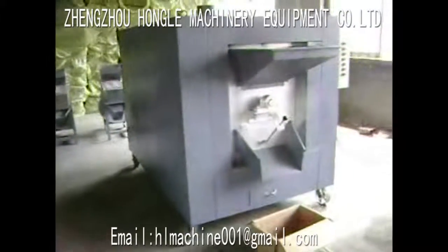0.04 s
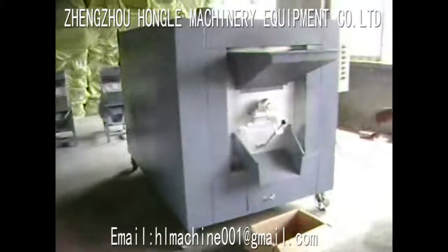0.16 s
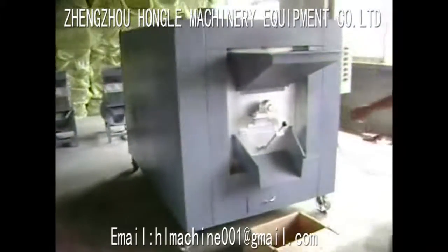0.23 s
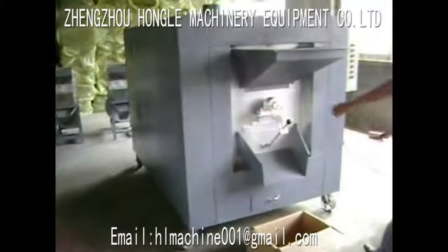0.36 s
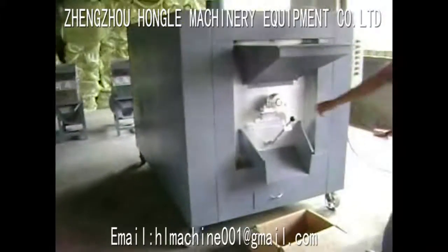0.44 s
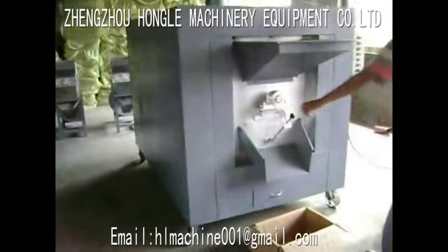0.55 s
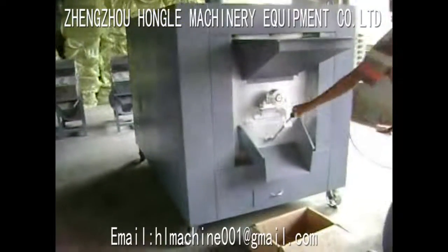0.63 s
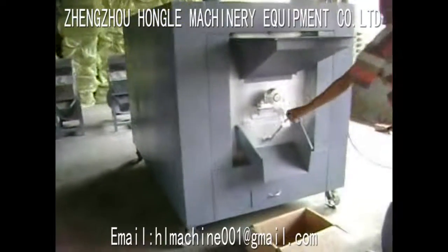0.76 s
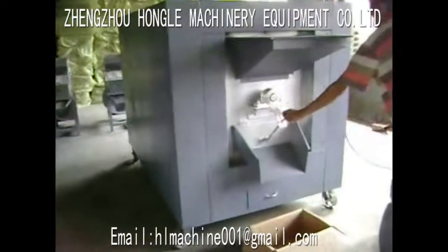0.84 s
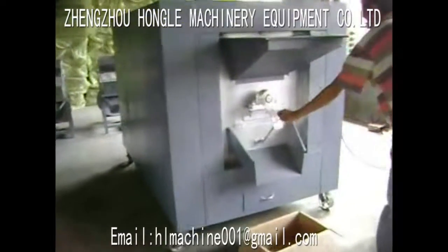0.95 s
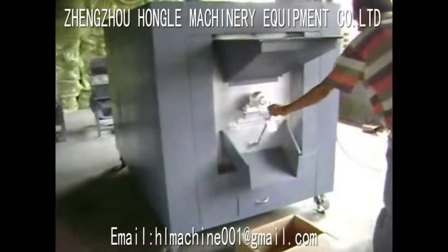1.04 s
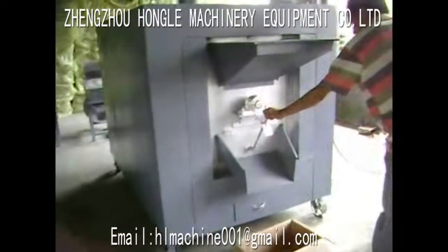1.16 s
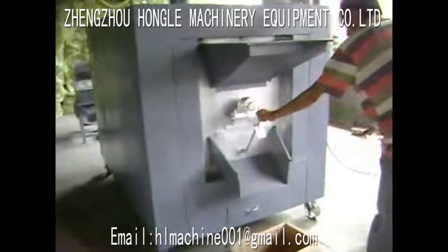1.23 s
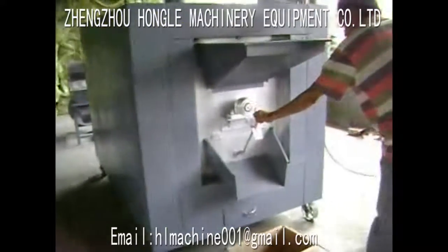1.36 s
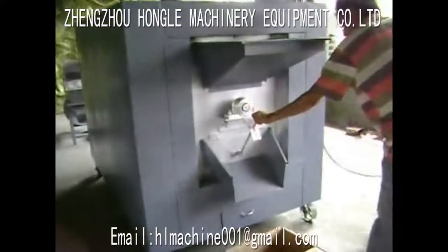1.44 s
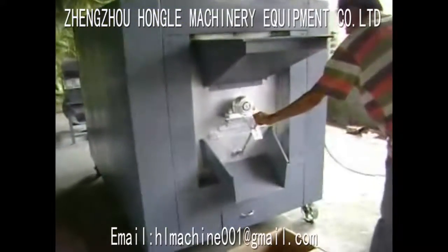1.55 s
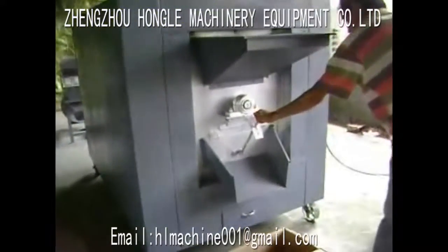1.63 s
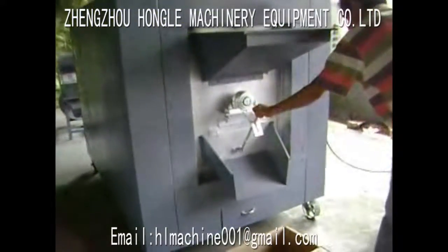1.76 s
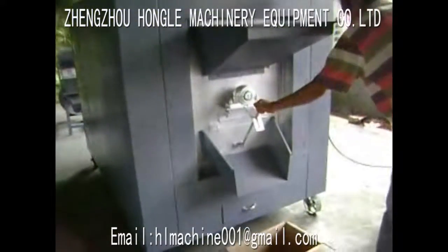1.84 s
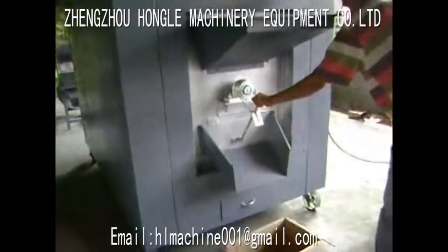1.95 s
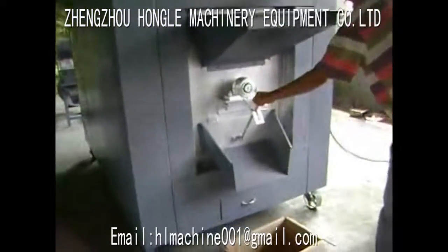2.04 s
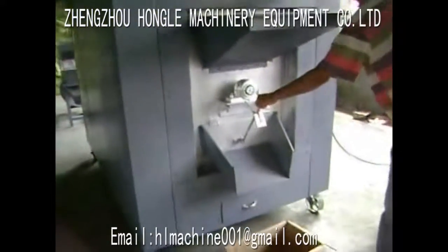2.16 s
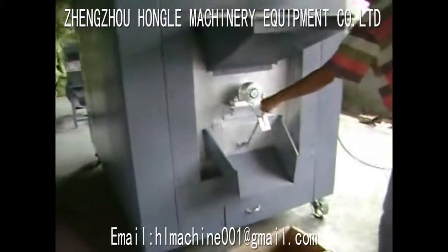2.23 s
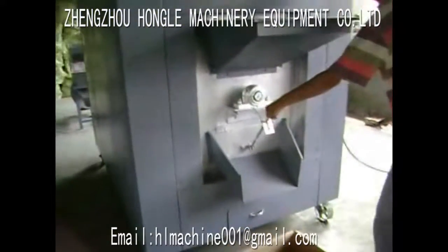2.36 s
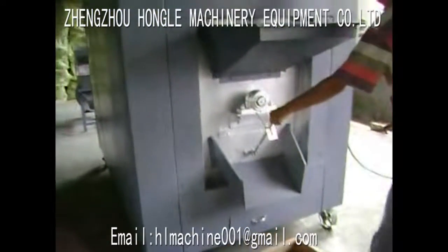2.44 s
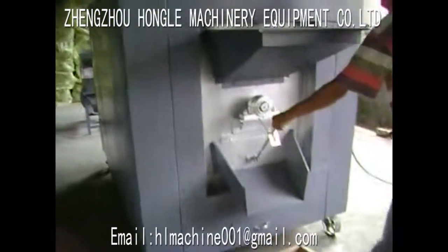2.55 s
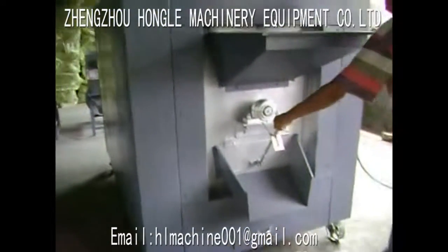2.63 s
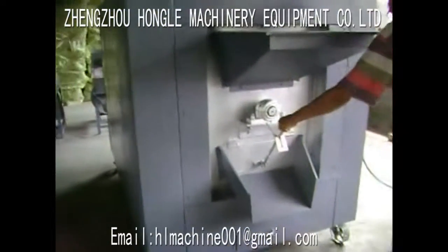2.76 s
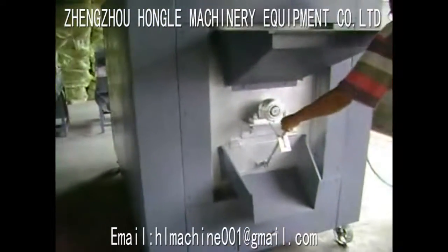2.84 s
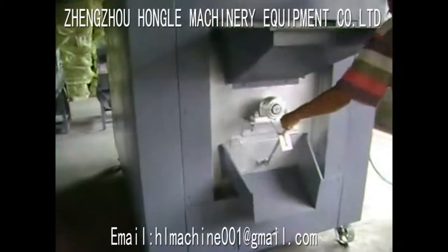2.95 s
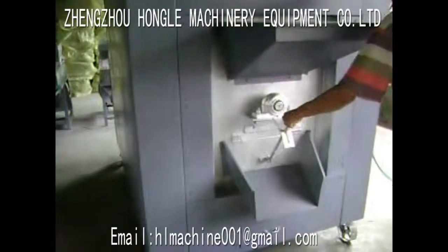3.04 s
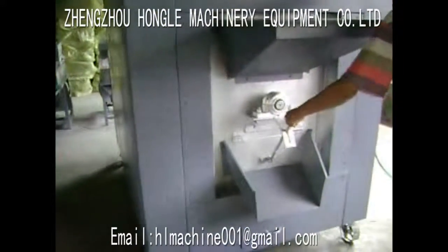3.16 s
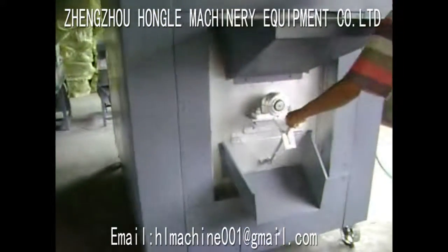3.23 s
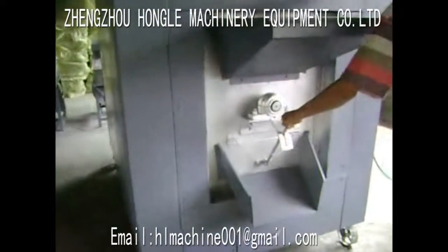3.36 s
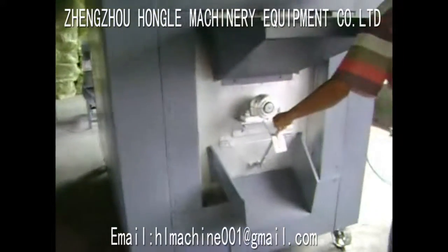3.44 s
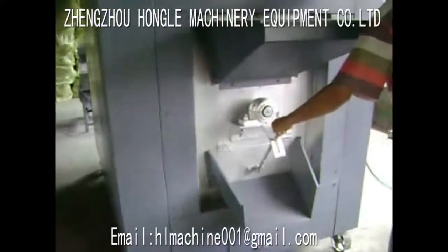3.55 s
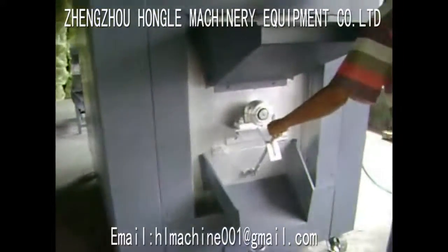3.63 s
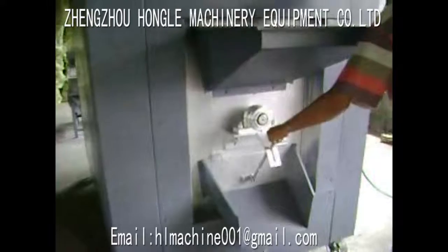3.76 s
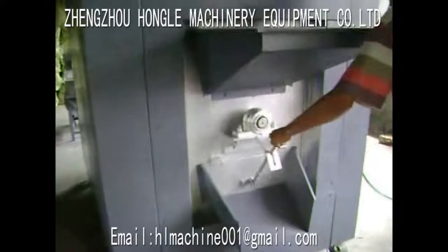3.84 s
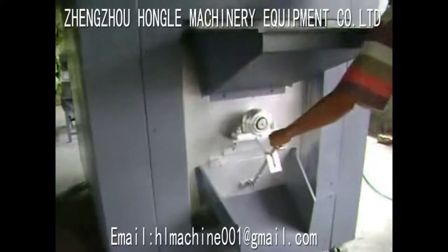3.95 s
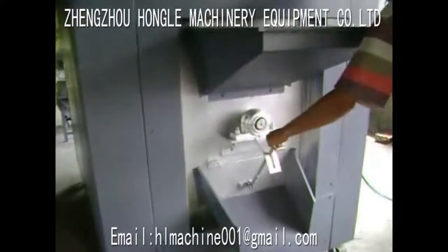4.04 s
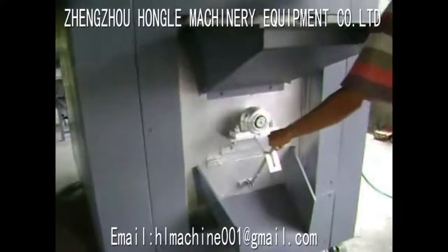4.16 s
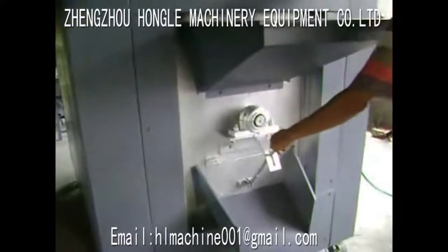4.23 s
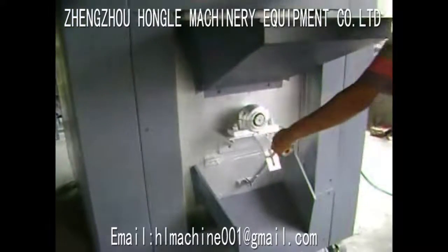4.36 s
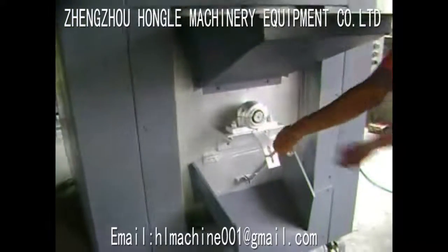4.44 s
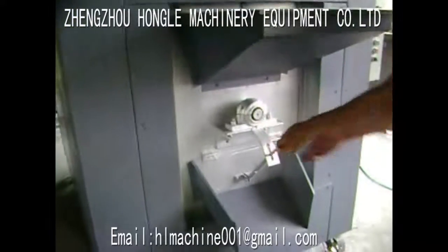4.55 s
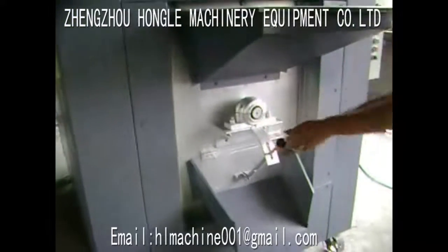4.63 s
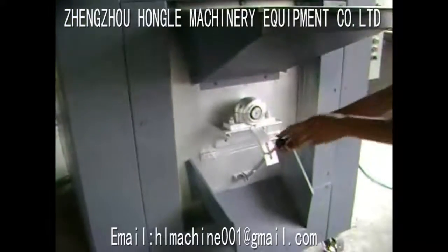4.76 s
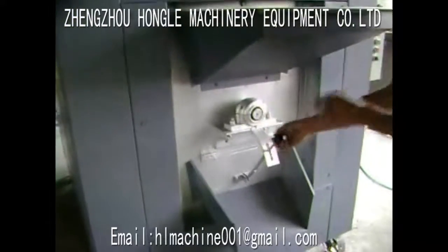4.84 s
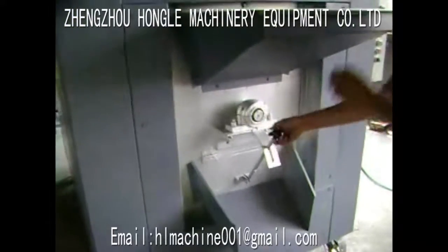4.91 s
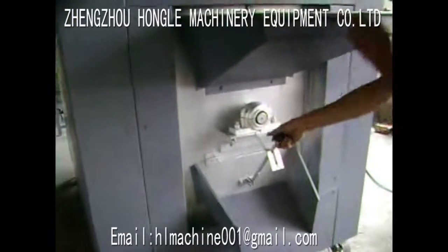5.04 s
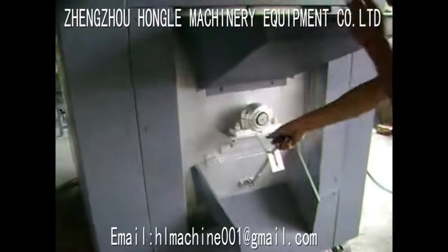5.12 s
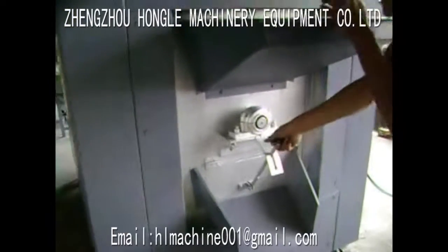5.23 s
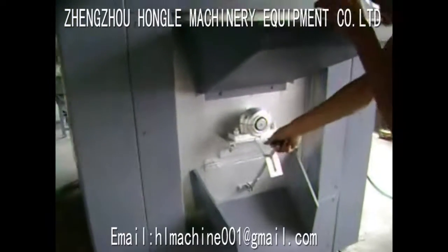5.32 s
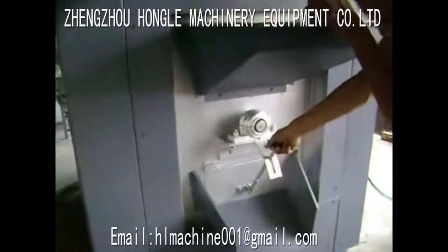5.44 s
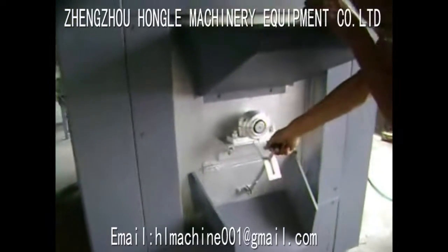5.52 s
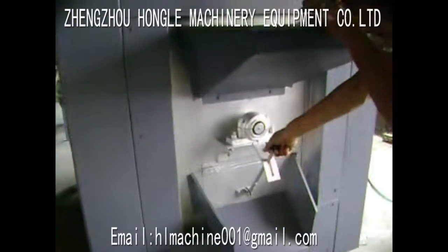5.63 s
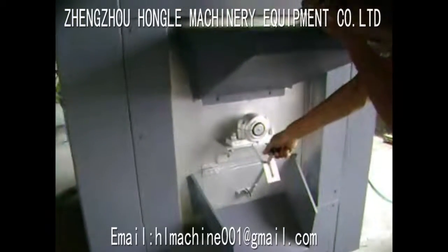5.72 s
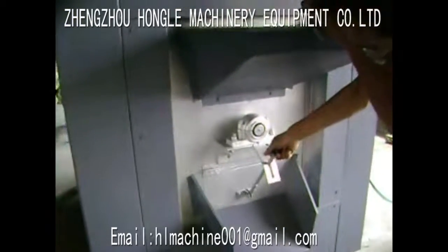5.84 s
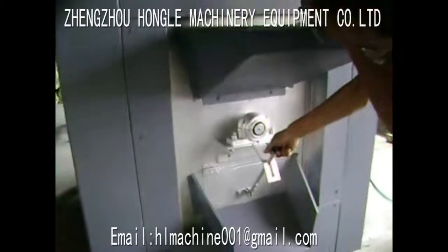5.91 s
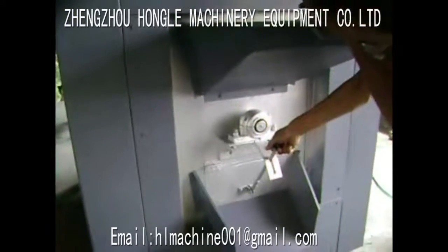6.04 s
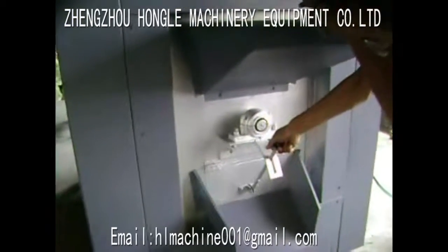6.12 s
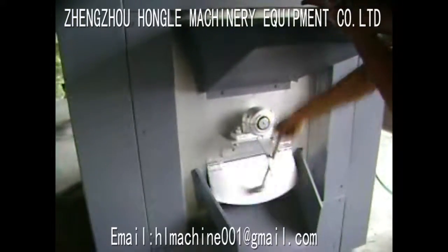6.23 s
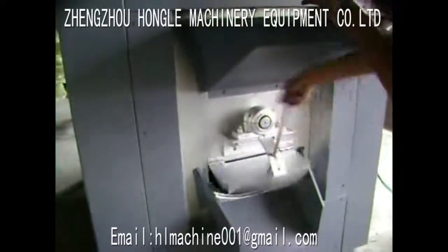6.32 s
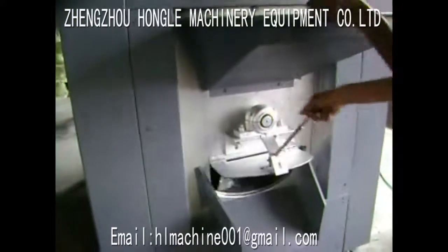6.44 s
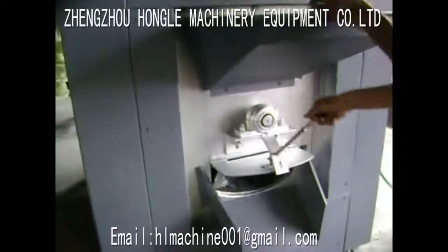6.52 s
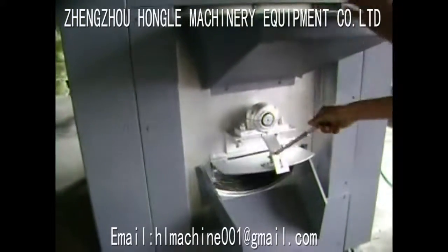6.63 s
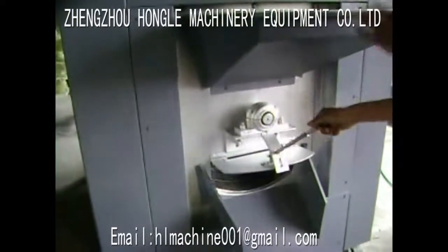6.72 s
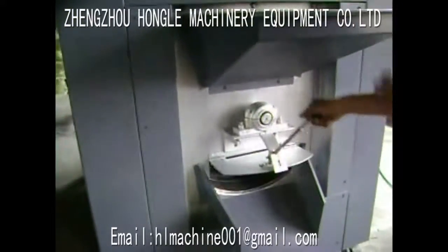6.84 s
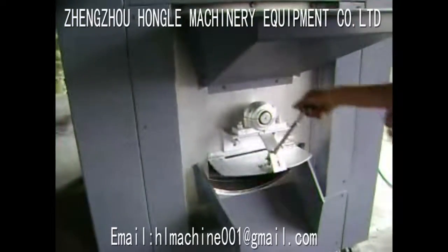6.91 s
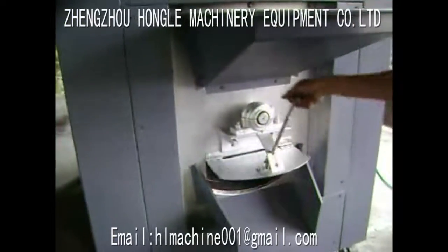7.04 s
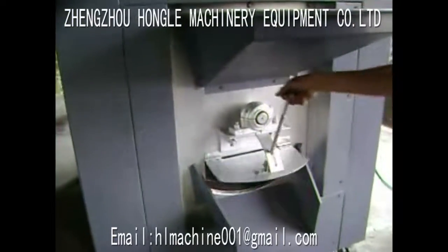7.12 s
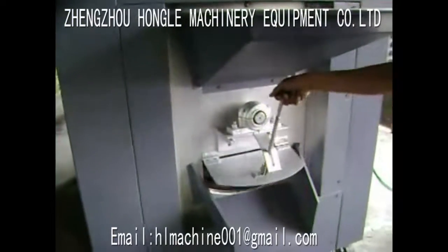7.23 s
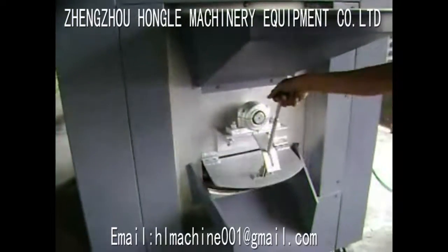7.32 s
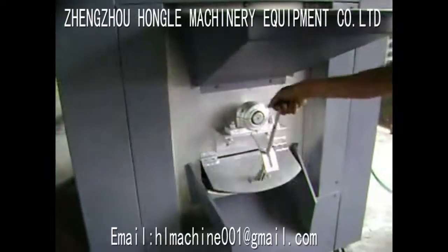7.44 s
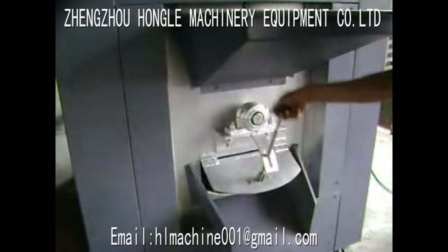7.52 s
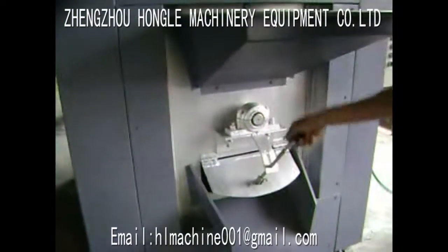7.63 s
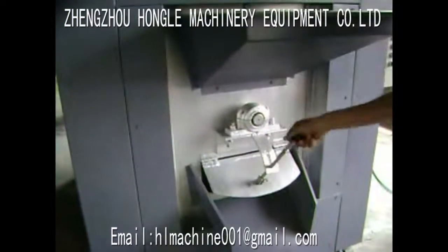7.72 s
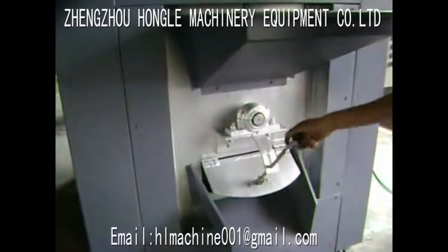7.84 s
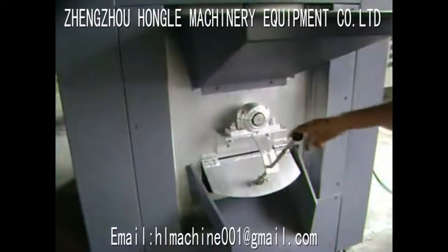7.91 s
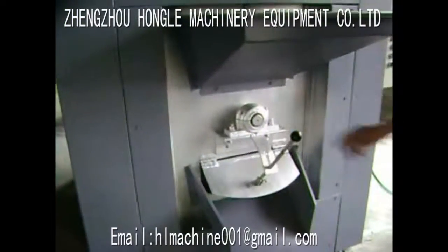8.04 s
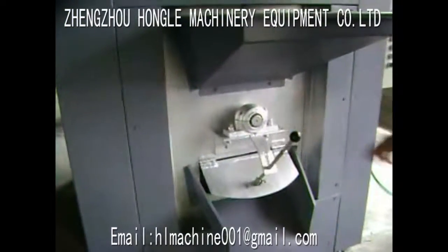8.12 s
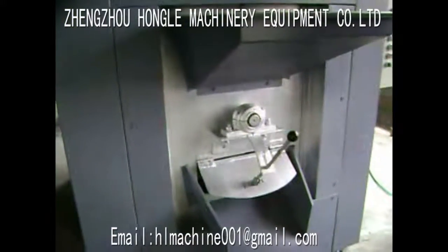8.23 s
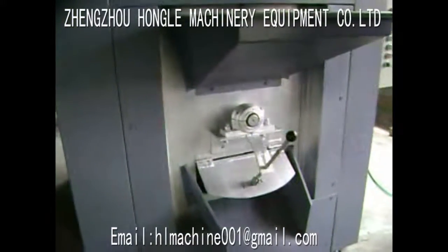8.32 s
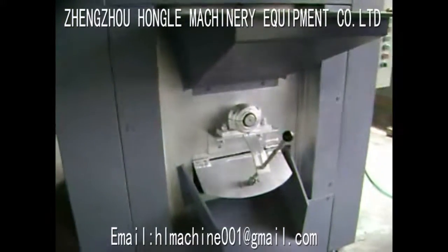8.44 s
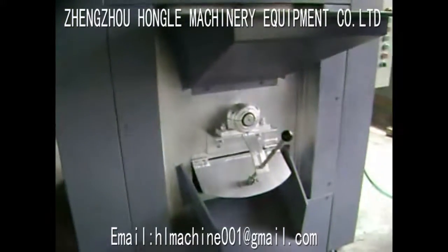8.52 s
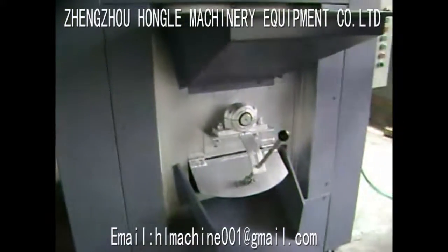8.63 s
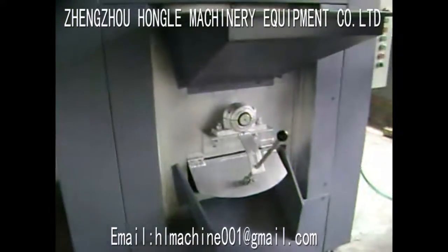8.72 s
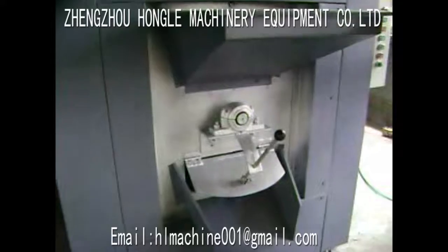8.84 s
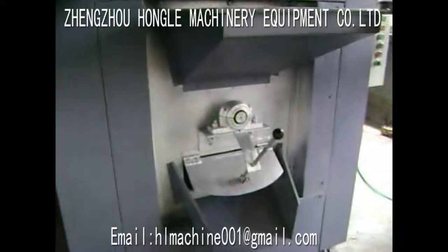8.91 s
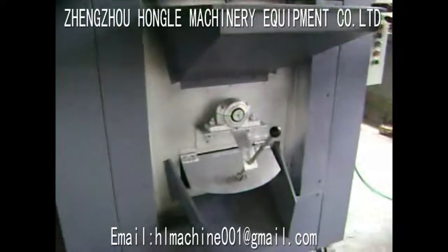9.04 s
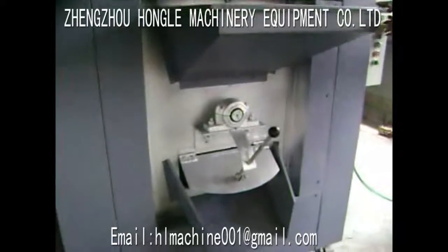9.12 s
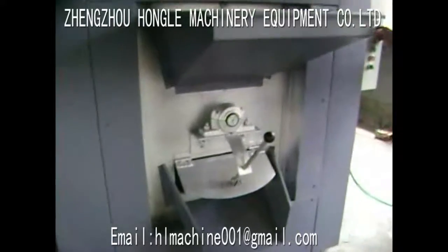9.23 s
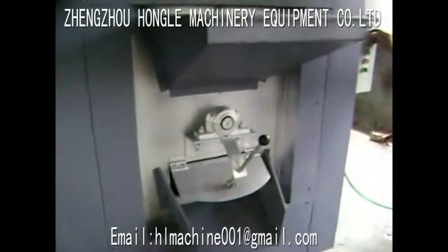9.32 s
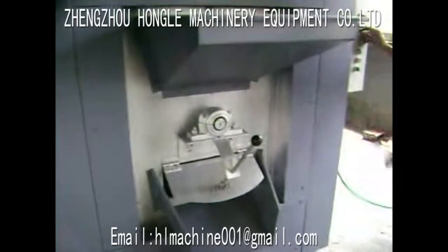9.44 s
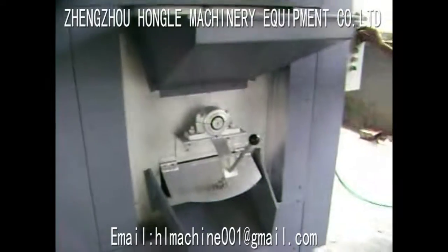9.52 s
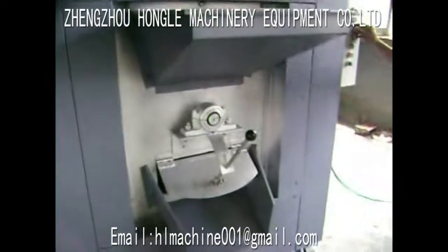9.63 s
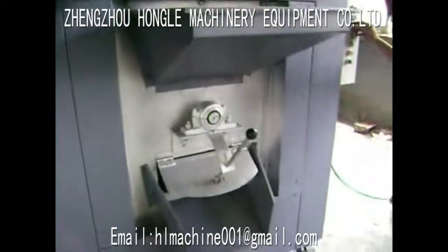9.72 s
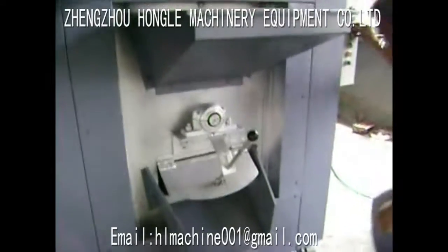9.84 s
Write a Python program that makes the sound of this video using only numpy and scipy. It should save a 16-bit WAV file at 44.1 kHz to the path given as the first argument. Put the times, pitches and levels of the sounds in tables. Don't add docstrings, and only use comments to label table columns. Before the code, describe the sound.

A drum roaster roars and whines steadily in a workshop while a steel lever knocks, its outlet door bangs open, groans and clacks shut.

```python
import sys
import numpy as np
from scipy import signal
from scipy.fft import rfft, irfft
from scipy.io import wavfile
from scipy.ndimage import uniform_filter1d

SR = 44100
rng = np.random.default_rng(int(sys.argv[2]) if len(sys.argv) > 2 else 0)


def store_pcm(level_fs):
    pcm = np.round(np.clip(level_fs, -1, 1) * 32767).astype(np.int16)
    wavfile.write(sys.argv[1], SR, np.atleast_2d(pcm).T)


def ratio_of_db(decibels):
    return 10 ** (np.asarray(decibels, float) / 20)


N = 435266

TOOTH_HZ = 133.82
LAND_S = 6.33

# frequency in Hz, density in dB per Hz.
CRACK = [(59, -46.5), (100, -14), (495, -5), (957, -5), (1220, -7), (1530, -15), (2200, -5.5),
         (3290, -15.5), (4650, -15.5), (6360, -32), (8270, -58), (14000, -120)]
# time in seconds, slip rate in Hz, level in dB.
GROAN = [
    (7.13, 133.3, -35.5),
    (7.23, 128.5, -28.5),
    (7.344, 129.3, -24.5),
    (7.414, 133.5, -45),
    (7.494, 127.8, -27),
    (7.53, 131, -46.5),
]


def evened(x):
    return x / np.sqrt(np.mean(x ** 2) + 1e-20)


def read(points, hz):
    f, value = np.transpose(points)
    return np.interp(np.log(hz + 1), np.log(f + 1), value)


def follow(rows, t):
    s, *columns = np.transpose(rows)
    return [np.interp(t, s, c) for c in columns]


def colour(x, points):
    gain = ratio_of_db(read(points, np.fft.rfftfreq(len(x), 1 / SR)))
    return evened(irfft(rfft(x) * gain, len(x)))


def resonate(x, hz, width):
    r = np.exp(-np.pi * width / SR)
    return 2 * signal.lfilter([1 - r], [1, -r * np.exp(2j * np.pi * hz / SR)], x).real


def resonate_twice(x, hz, width):
    return resonate(resonate(x, hz, width), hz, width)


def bump(t, middle, length):
    return np.cos(np.pi * np.clip((t - middle) / length, -.5, .5)) ** 2


def drift(t, top_hz):
    coarse = t[::512]
    waves = [np.sin(2 * np.pi * (f * coarse + rng.random())) / np.sqrt(f) for f in np.geomspace(.2, top_hz, num=20)]
    return np.interp(t, coarse, evened(sum(waves)))


def swell(t, rest_db, rows):
    coarse = t[::64]
    rises = sum(ratio_of_db(db) * bump(coarse, s, n) for s, n, db in rows)
    return ratio_of_db(rest_db) + np.interp(t, coarse, rises)


def tone(turns, db):
    return np.sqrt(2) * ratio_of_db(db) * np.sin(2 * np.pi * (turns + rng.random()))


def add(mix, s, sound):
    part = mix[round(s * SR):][:len(sound)]
    part += sound[:len(part)]


def mains_hum():
    t = np.arange(N) / SR
    start_s, period_s, rest, skew = .2, 2.35, 0.26, 0.4
    surge = np.sin(np.pi * ((t - start_s) / period_s % 1) ** skew) ** 2
    level = ratio_of_db(-44) * (rest + surge) + ratio_of_db(-44) * bump(t, 5.55, 1.0)
    return tone(50.2 * t, 1.2 * drift(t, 20)) * level


def panel():
    # middle in seconds, length in seconds, top level in dB.
    sings = [(.05, .4, -31), (1.3, 1.3, -33.5), (2.1, .7, -32.5), (2.58, .4, -34), (3.41, 0.36, -33),
             (4.12, .7, -38.5), (5.95, 1.1, -34), (6.5, .7, -34), (7.72, .5, -35.5), (8.77, 0.72, -34),
             (9.75, .6, -28.5)]
    t = np.arange(N) / SR
    turns = np.cumsum(526 * (1 + .006 * drift(t, 25))) / SR
    return tone(turns, -4 + 1.7 * drift(t, 21)) * swell(t, -43.5, sings)


def gears():
    # order of the tooth rate, level in dB.
    weak_orders = [(15, -46.5), (18, -46.5), (4, -47), (9, -46)]
    # order of the tooth rate, resting level in dB.
    strong_orders = [(16, -42), (17, -42.5), (5, -45), (6, -46)]
    # middle in seconds, length in seconds, order, top level in dB.
    swells = [(.25, 0.62, 16, -31.5), (.72, .6, 16, -35), (1.17, .35, 16, -34), (1.63, 0.63, 16, -30.5),
              (2.17, 1, 16, -33), (2.7, 0.53, 16, -41), (3.15, .5, 16, -42), (3.88, 0.54, 16, -34.5),
              (4.9, 1.2, 16, -38.5), (7.15, 1.4, 16, -38.5), (8.6, .4, 16, -42), (8.98, .6, 16, -37),
              (.75, .7, 17, -41), (2.15, 0.65, 17, -38.5), (3.05, .9, 17, -41.5), (5.0, 1.36, 17, -38.5),
              (7.15, .9, 17, -30.5), (7.75, 1.2, 17, -34), (8.78, 0.42, 17, -39), (9.82, .6, 17, -34.5),
              (2.1, 1.4, 5, -36), (3.6, 1.06, 5, -32), (4.42, 0.98, 5, -33), (5.6, 1.1, 5, -36.5),
              (6.7, .9, 5, -36.5), (.5, 1.0, 6, -37.5), (1.3, .7, 6, -37), (3.05, 0.65, 6, -36.5),
              (7.5, 1.1, 6, -37.5), (8.33, .5, 6, -43)]
    t = np.arange(N) / SR
    teeth = np.cumsum(TOOTH_HZ * (1 + 0.00036 * drift(t, 4))) / SR
    out = np.zeros(N)
    for order, rest_db in strong_orders:
        rows = [(s, n, db) for s, n, k, db in swells if k == order]
        out += tone(order * teeth, 1.1) * swell(t, rest_db, rows)
    for order, db in weak_orders:
        out += tone(order * teeth, db + 4.0 * drift(t, 2.1))
    return out


def tumble():
    # frequency in Hz, density in dB per Hz.
    roar = [(25, -23), (80, -16.5), (103, -10), (272, -7), (443, -12.5), (521, -0.5), (584, -4.5), (656, 2),
            (867, -1), (1230, 0), (1510, -9), (2190, -12.5), (2580, -12), (5040, -15), (6360, -29.5),
            (8270, -69), (14000, -120)]
    # frequency in Hz, width in Hz, dB over the roar.
    casing = [(30, 33, 7), (96, 13, 10), (185.6, 26, 2), (290, 55, -3), (369, 39, 8), (524, 23, 1.5),
              (752, 25, -6), (1222, 29, 0.5), (2226, 520, .6)]
    # middle in seconds, length
    # in seconds, rise in dB, share of that rise in the casing band.
    surges = [(.65, 1.1, 1.5, 0.5), (1.197, .4, 3.5, .7), (1.671, 0.43, 3, .8), (2.75, 0.9, 2, 0.5),
              (3.3, 0.33, 1.5, 1.), (3.87, 0.37, 3.5, 0.2), (4.3, 0.59, -2, .3), (5.007, 1, 3, .4),
              (6.421, 0.29, 15.5, 1.), (6.661, 0.51, 3.5, .95), (7.25, 0.93, 8, 0.44), (7.8, 1.34, 7, 0.2),
              (8.57, 0.49, 9, 0.26), (8.95, 1.06, 2.5, .6), (9.793, 1, 9.5, .3)]
    # middle in seconds, length in seconds, rise in dB.
    booms = [
        (.05, .6, -5.5),
        (1.1, 0.55, 3),
        (2.3, .6, -2),
        (3.35, .5, 3.5),
        (4.0, .3, 3),
        (5.9, .8, 2.5),
        (6.6, .45, 9.5),
        (7.719, 0.65, 6.5),
        (9.3, .6, -1.5),
    ]
    strikes = rng.random(N) < 2500 / SR
    size = ratio_of_db(2.8 * np.minimum(rng.exponential(1, N), 4)) * strikes
    grains = signal.lfilter([1], [1, -.96], size) * rng.standard_normal(N)
    mesh = 1 + .07 * np.cos(2 * np.pi * TOOTH_HZ * np.arange(N) / SR)
    drive = mesh * (0.86 * evened(grains) + rng.standard_normal(N))
    hz, t, z = signal.stft(evened(drive), SR, nperseg=1024, noverlap=768)

    peaks = 1 + sum(ratio_of_db(db) / np.sqrt(1 + (2 * (hz - f) / w) ** 4) for f, w, db in casing)
    shape = ratio_of_db(read(roar, hz)) * peaks
    rattle_db = sum(db * bump(t, s, n) for s, n, db, share in surges)
    casing_db = sum(share * db * bump(t, s, n) for s, n, db, share in surges)
    deep_db = 0.27 * rattle_db + sum(db * bump(t, s, n) for s, n, db in booms)
    levels = np.array([-26.5 + casing_db, -33.5 + rattle_db, -37 + deep_db])
    bands = [(hz > lo) & (hz < hi) for lo, hi in ((300, 1500), (2500, 6000), (70, 300))]
    levels -= 10 * np.log10([np.sum(shape[b] ** 2) / len(hz) for b in bands])[:, None]

    bright = np.clip((hz[:, None] - 1200) / 1000, 0, 1)
    deep = np.clip((320 - hz[:, None]) / 100, 0, 1)
    level_db = (1 - bright - deep) * levels[0] + bright * levels[1] + deep * levels[2]
    patches = uniform_filter1d(rng.standard_normal(z.shape[::-1]), 12, 0)
    patches = evened(uniform_filter1d(patches, 10, 1)).T
    z = z * shape[:, None] * ratio_of_db(level_db - 1.0 + 1.16 * patches)
    return signal.istft(z, SR, nperseg=1024, noverlap=768)[1][:N]


def workshop(x):
    # frequency in Hz, decay time t60 in seconds.
    decay = [(200, 0.65), (1000, 0.38), (2200, .22), (5000, 0.18)]
    taps = np.zeros(SR)
    at = np.arange(300, SR - 20, 20)
    taps[at + rng.integers(0, 20, len(at))] = rng.choice([-1., 1.], len(at))
    hz, t, z = signal.stft(taps, SR, nperseg=256)
    fade = ratio_of_db(-60 * t / read(decay, hz)[:, None])
    tail = signal.istft(z * fade, SR, nperseg=256)[1]
    return signal.fftconvolve(x, tail / np.linalg.norm(tail))[:N]


def rub(db, hz, width, length):
    u = np.linspace(0, 1, round(length * SR))
    noise = resonate_twice(rng.standard_normal(len(u)), hz, width)
    return ratio_of_db(db) * evened(noise) * evened(u ** .4 * (1 - u))


def pin(peak_db):
    # frequency in Hz, level in dB, decay time t60 in seconds.
    rings = [(2080, 3.5, 0.055), (2730, -2.5, 0.053), (4030, -4, .05), (5550, -16, .04)]
    t = np.arange(SR // 4) / SR
    return sum(ratio_of_db(peak_db + db - 60 * t / s) * np.sin(2 * np.pi * f * t) for f, db, s in rings)


def hinge():
    t = np.arange(GROAN[0][0], GROAN[-1][0], 1 / SR)
    hz, db = follow(GROAN, t)
    jitter = 0.7 * uniform_filter1d(rng.standard_normal(len(t)), 150)
    turns = np.cumsum(hz * (1 + jitter)) / SR
    slips = sum(np.cos(2 * np.pi * k * turns) for k in range(1, 12))
    low = sum(a * np.cos(2 * np.pi * k * turns) for k, a in ((1, .75), (2, .8), (3, .4)))
    low *= ratio_of_db(2.5 * evened(uniform_filter1d(rng.standard_normal(len(t)), 600)) - 2.5)
    plate = .5 * resonate(slips, 760, 120) + 1.2 * resonate(slips, 1150, 260) + 0.28 * resonate(slips, 525, 80)
    return np.sqrt(2) * ratio_of_db(db) * (low + plate) * signal.windows.tukey(len(t), .2)


def slam():
    # frequency in Hz, width in Hz, level in dB.
    door = [(532, 36, -1), (616, 46, -9), (257, 23, -12), (1228, 27, -11), (379, 18, -9.5),
            (150, 45, -16.5)]
    # time in seconds, frame level in dB.
    bounces = [
        (6.33, -11),
        (6.395, -11.5),
        (6.44, -10.5),
        (6.509, -12),
        (6.54, -15.5),
    ]
    shudder_s, still_s, gone_s = 6.385, 6.497, 6.75
    t = np.arange(LAND_S, gone_s, 1 / SR)
    plate_db = -9.5 - 125 * np.maximum(t - still_s, 0)
    ring_db = np.where((t > shudder_s) & (t < still_s), -0.7, plate_db)
    frame_db = np.max([np.where(t >= s, db - 130.5 * (t - s), -60) for s, db in bounces], axis=0)
    clatter_db = -8 - 100 * abs(t - shudder_s)

    shake = rng.standard_normal(len(t))
    ring = np.sin(2 * np.pi * np.cumsum(735 * (1 + .3 * uniform_filter1d(shake, 300))) / SR)
    frame = sum(ratio_of_db(db) * evened(resonate(shake, f, w)) for f, w, db in door)
    strikes = 0.98 + signal.lfilter([1], [1, -.99], rng.random(len(t)) < 350 / SR)
    clatter = evened(strikes * colour(rng.standard_normal(len(t)), CRACK))
    out = ratio_of_db(uniform_filter1d(ring_db, size=400)) * ring
    out += ratio_of_db(uniform_filter1d(frame_db, size=400)) * frame
    out += ratio_of_db(clatter_db) * clatter
    return out * signal.windows.tukey(len(t), .02)


def blow(peak_db, low_hz, treble_db):
    # frequency in Hz, level in dB, decay time t60 in seconds.
    lever = [(532, -5, 0.37), (728, -7, 0.46), (786, -6, 0.065), (1080, 0.5, 0.086), (1240, 0.5, .12),
             (1890, -7.5, 0.027), (2443, -7, 0.035), (2840, -4, 0.068), (4140, -9, 0.036)]
    t = np.arange(SR // 3) / SR
    t60 = .105 * (700 / low_hz) ** 0.26

    def fade(db, s):
        return ratio_of_db(db - 60 * t / s)

    def ring(hz, db, s):
        return fade(db, s) * np.sin(2 * np.pi * (hz * t + rng.random()))

    def cluster(hz, width):
        return evened(resonate_twice(rng.standard_normal(2 * len(t)), hz, width)[len(t):])

    crack = colour(rng.standard_normal(len(t)), CRACK)
    bright = signal.lfilter(*signal.butter(2, 1500, "high", fs=SR), crack)
    crack = (crack - bright) * fade(0.13, 1.02 * t60) + bright * fade(treble_db + 11, 0.79 * t60)
    spot = ring(low_hz, -8, 1.1 * t60)
    spot += fade(-5.5, 1.1 * t60) * cluster(low_hz, 220)
    spot += fade(treble_db - 7, 0.4 * t60) * cluster(2220, 370)
    body = np.zeros(len(t))
    for f, db, s in lever:
        detune, lift = rng.standard_normal(2)
        body += ring(f * (1 + .015 * detune), db - 11 + 3 * lift, s)
    rise = 1 - np.exp(-t / 0.00067)
    snap = 1 + .6 * np.exp(-t / .003)
    return ratio_of_db(peak_db - 10.5) * rise * (0.79 * snap * crack + spot + body)


def scene():
    # time in seconds, peak in dB, pitch of the spot struck in Hz, treble in dB.
    blows = [(0.521, -2.5, 900, -13.5), (0.535, -10, 880, -14), (1.114, 3, 970, .6),
             (1.132, 1.5, 710, -5.5), (2.169, -9.5, 654, -9.5), (2.726, 0.9, 1240, -7),
             (3.159, -10.5, 1080, -9), (3.227, -3, 760, -10.5), (3.242, -2.5, 1150, -11),
             (3.848, -7, 538, -14), (3.894, 0, 527, -11.5), (4.011, -18, 732, -6), (4.076, -7.5, 1240, -12),
             (4.507, -11, 507, -14), (5.022, 3.8, 517, -5), (5.225, -1.3, 500, -6), (5.309, -3.5, 990, -7),
             (6.329, 6, 733, -11), (6.413, 10.5, 720, -10), (6.507, .6, 620, -17), (7.543, 7, 1120, -10.5),
             (7.557, 0.8, 1240, -6.5), (7.583, -3, 800, -1.5), (7.629, -3.5, 628, -12.5),
             (7.669, -11.5, 529, -9), (7.746, 1, 1154, -8.5), (7.761, -7, 660, -9.5),
             (7.829, -9.5, 670, -9.5), (9.813, -11, 1100, -8)]
    # start in
    # seconds, level in dB, frequency in Hz, width in Hz, length in seconds.
    rubs = [(.53, -25, 990, 450, .13), (1.039, -26.5, 920, 740, 0.073), (1.12, -20, 730, 140, .05),
            (3.23, -20.5, 610, 130, 0.041), (5.312, -26, 1920, 170, 0.037), (9.66, -34, 2360, 70, 0.2),
            (6.7, -35.5, 349, 54, 0.32), (2.165, -34, 2200, 170, .03), (7.755, -18.5, 630, 130, 0.028),
            (7.748, -15, 1170, 150, 0.02), (1.16, -36.5, 290, 50, 0.37), (1.6, -30, 660, 330, 0.35),
            (2.9, -27.5, 1100, 300, 0.066), (7.552, -13, 1240, 49.8, 0.035), (7.552, -14.5, 785, 60, .04),
            (2.73, -26, 480, 300, 0.058), (3.86, -30, 350, 160, 0.11), (4.7, -29, 700, 400, 0.07),
            (4.772, -22.5, 810, 150, 0.046), (7.26, -33.5, 750, 60, 0.3), (8.52, -33.5, 800, 54, 0.16),
            (8.62, -33, 340, 40, 0.16), (8.88, -38.5, 310, 57, 0.35), (8.8, -27, 770, 67, 0.066)]
    machine = mains_hum() + panel() + gears() + tumble()
    hand = np.zeros(N)
    for s, *row in rubs:
        add(hand, s, rub(*row))
    add(hand, 7.584, pin(-5))
    for s, *row in blows:
        add(hand, s, blow(*row))
    wet = hand + ratio_of_db(-9) * workshop(hand)
    add(wet, GROAN[0][0], hinge())
    add(wet, LAND_S, slam())
    ending = np.minimum(np.arange(N)[::-1] / 150, 1)
    return ((wet + machine) * ending)[None]


def roll_off(x):
    return signal.sosfilt(signal.butter(12, 15500, fs=SR, output="sos"), x)


def record(dry):
    lowpass = signal.firwin(101, 6600, window=("kaiser", 9), fs=SR)
    dull = signal.oaconvolve(dry, lowpass[None], "same")
    return roll_off(np.clip(dull, -1, 1))


dry = scene()
out = record(dry)
store_pcm(out)
```